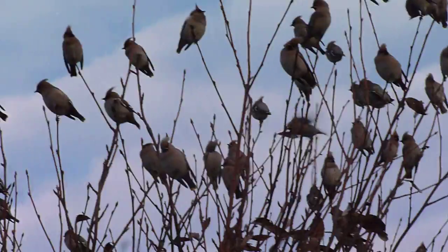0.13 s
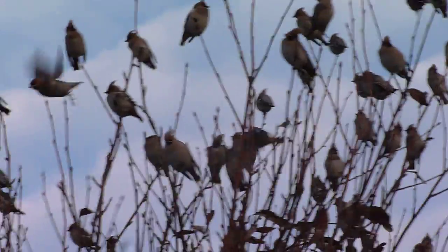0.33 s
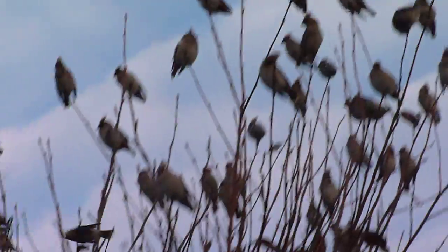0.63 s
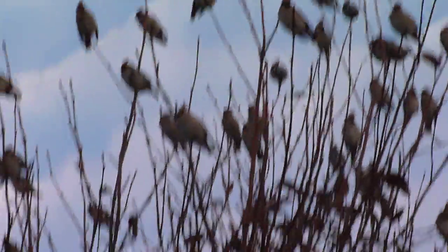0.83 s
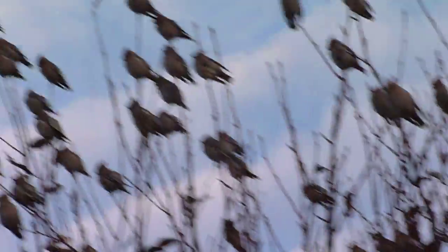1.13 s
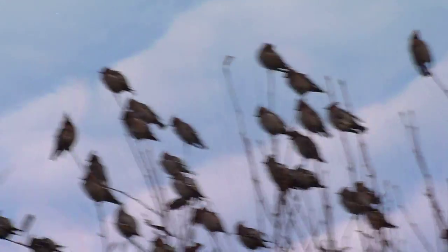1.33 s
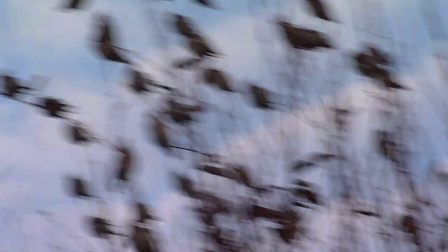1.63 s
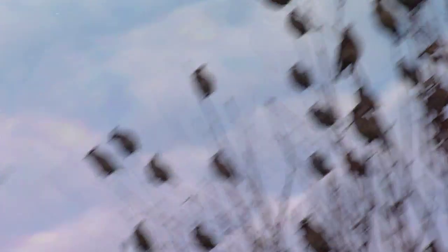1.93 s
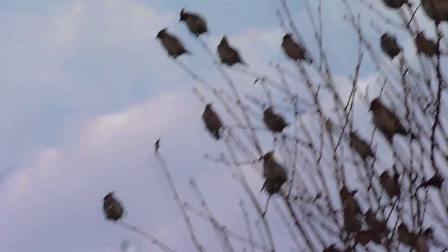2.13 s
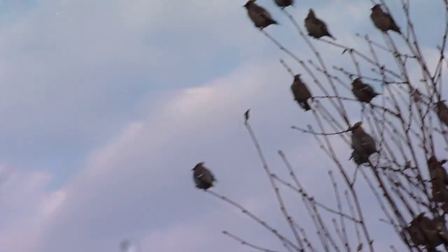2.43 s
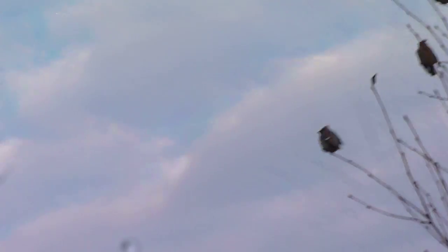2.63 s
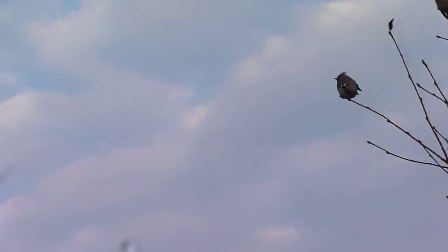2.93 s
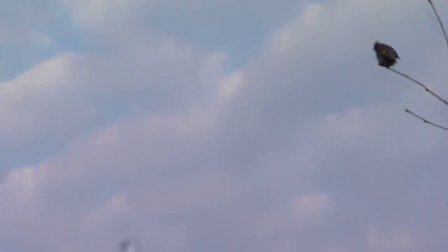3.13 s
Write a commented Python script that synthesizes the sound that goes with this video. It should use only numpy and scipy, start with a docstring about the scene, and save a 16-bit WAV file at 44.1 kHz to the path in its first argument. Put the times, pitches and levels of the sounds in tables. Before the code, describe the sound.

A flock of waxwings trills in bare bushes outdoors, high, rapid whistles overlapping and swelling midway, a few birds closer than the rest. Twigs tick and one snaps sharply early on, while distant traffic rumbles steadily throughout.

```python
"""In bare bushes, with distant traffic rumbling steadily behind, a flock of waxwings trills.
Each trill is a run of whistled syllables, about 18 a second, that flick up, slide down and plunge.
A few near birds stand out from the chorus, which swells midway, and the branches give the calls
a short tail. Twigs snap and tick as the birds shift, and the bush rustles once."""
import sys
import numpy as np
from scipy import signal
from scipy.fft import rfft, irfft
from scipy.io import wavfile
from scipy.ndimage import uniform_filter1d

SR = 44100
rng = np.random.default_rng(int(sys.argv[2]) if len(sys.argv) > 2 else 0)


def transcribe(signal):
    """Save signal, clipped to [-1, 1], as a 16-bit WAV file at the path in sys.argv[1]."""
    frames = np.atleast_2d(signal).T
    limited = np.clip(frames, -1, 1)
    pcm = np.round(limited * 32767).astype(np.int16)
    wavfile.write(sys.argv[1], SR, pcm)


N = 145530


def amp(db):
    """Decibels to gain."""
    return 10 ** (np.asarray(db) / 20)


def unit(x):
    """Scales to rms 1."""
    return x / np.sqrt(np.mean(x ** 2) + 1e-20)


def curve_at(points, hz):
    """Reads an EQ curve on a log-frequency axis."""
    f, db = np.transpose(points)
    return np.interp(np.log(hz + 1), np.log(f + 1), db)


def bell(hz, centre_hz, octaves):
    """A bell-shaped band, 1 at its centre."""
    return np.exp(-.5 * (np.log2((hz + 1) / centre_hz) / octaves) ** 2)


def equalise(x, points):
    """Filters by an EQ curve in dB."""
    gain = amp(curve_at(points, np.fft.rfftfreq(2 * N, 1 / SR)))
    return irfft(rfft(x, 2 * N) * gain)[:N]


def add(mix, s, sound):
    """Mixes a sound in at a time, which may lie before the start."""
    at = round(s * SR)
    sound = sound[max(-at, 0):]
    part = mix[max(at, 0):][:len(sound)]
    part += sound[:len(part)]


def drift(t, step_s, count=48):
    """A smooth random wander."""
    return np.interp(t / step_s, np.arange(count), rng.standard_normal(count))


TYRE_DB_PER_S, DRONE_DB_PER_S = -0.75, 0.4  # the tyre roar recedes, the engine drone draws nearer
# Tone of the far traffic and open air. Each row: frequency in Hz, relative level in dB.
TRAFFIC_EQ = [(20, -27), (36, -20), (50, -3.5), (64, -3), (76, -2), (95, -1), (200, -1), (310, -1),
              (410, -6.5), (700, -1.5), (980, -3), (1400, -11.5), (2000, -21), (3000, -30.5), (4500, -34),
              (6000, -38), (7200, -50.5)]
# Fader ride on the low rumble. Each row: time in seconds, boost or cut in dB.
RUMBLE_RIDE = [(0, 0.5), (.6, -0.6), (.95, 1.6), (1.3, 0.8), (1.9, 0.5), (2.15, 0.5), (2.42, -0.1),
               (2.85, 1), (3.3, -0.5)]


def traffic():
    """Far engines and tyres merge into a soft bed of roar whose balance slowly shifts."""
    frames, hz = N // 1024 + 5, np.fft.rfftfreq(4096, 1 / SR)
    t = np.arange(frames)[:, None] * 1024 / SR
    real, imag, patches = rng.standard_normal((3, frames, len(hz)))
    patches = uniform_filter1d(patches, size=4, axis=0)
    patches_db = 0.35 * unit(uniform_filter1d(patches, size=24, axis=1))  # a faintly uneven texture
    tyres = TYRE_DB_PER_S * bell(hz, centre_hz=1250, octaves=0.62)
    drone = DRONE_DB_PER_S * bell(hz, centre_hz=75, octaves=0.78)
    shift_db = (t - N / SR / 2) * (tyres + drone)
    rumble_db = np.interp(t, *np.transpose(RUMBLE_RIDE)) * bell(hz, centre_hz=190, octaves=0.54)
    spectra = (real + 1j * imag) * amp(curve_at(TRAFFIC_EQ, hz) + patches_db + rumble_db + shift_db)
    roar = signal.istft(spectra.T, nperseg=4096, noverlap=3072)[1][:N]
    return amp(-26.5) * unit(roar)


def engine_hum(pitch_hz=75.4):
    """A far engine's wavering note comes and goes as it draws nearer."""
    t = np.arange(N) / SR
    hz = pitch_hz * (1 + 0.051 * drift(t, step_s=.09))
    level = amp(DRONE_DB_PER_S * t) * (1 + 0.19 * drift(t, step_s=0.13))
    return amp(-43) * unit(level * np.sin(2 * np.pi * np.cumsum(hz) / SR))


# Tone of the rustle. Each row: frequency in Hz, relative level in dB.
RUSTLE_EQ = [(1000, -36), (2200, -10), (3200, -2), (5000, -15), (7500, -14)]


def rustle(peak_s=1.47, width_s=0.025, grains_per_s=1500):
    """A brief, grainy rustle in the bush: one swell of tiny clicks."""
    swell = np.exp(-.5 * ((np.arange(N) / SR - peak_s) / width_s) ** 2)
    grains = rng.standard_normal(N) * (rng.random(N) < grains_per_s / SR)
    return amp(-46) * swell * unit(equalise(grains, RUSTLE_EQ))


# The woody ring of a twig. Each row: frequency in Hz, relative level in dB, seconds to fall 60 dB.
TWIG_MODES = [(1000, -7.5, 0.0044), (1330, 7.5, 0.0089), (1660, -4, 0.0067), (2970, -4, 0.022),
              (3600, -6, 0.016), (4760, 0.5, 0.0054)]
# Snap cues. Each row: start in seconds, peak of the first break in dB, brightness in dB per octave,
# strength of the second break against the first, ring time multiplier.
TWIG_SNAPS = [(.1812, -26, 2, 0.23, 0.87), (.2705, -32, 7, 0.27, 0.92), (.2905, -32, 4, 0.24, 1.0),
              (.3020, -35, 7, .3, 1.0), (.5277, -9.3, -.4, .4, .85), (.7305, -20.5, 0, .7, 2.0),
              (1.4840, -29.5, 8, 0.86, 1.0), (1.4958, -31.5, 4, .6, 1.0), (2.7847, -29, 4.5, 0.7, 1.3)]


def twigs(splinter_s=0.001134, attack_s=0.0002):
    """Dry snaps break in two quick steps, each ringing the twig's modes for a few milliseconds."""
    out, t = np.zeros(N), np.arange(SR // 40) / SR
    attack = 1 - np.exp(-(t / attack_s) ** 2)
    for start, peak_db, brightness, second, ring_scale in TWIG_SNAPS:
        for delay, strength in (0, 1), (splinter_s, second):
            ring = np.zeros(len(t))
            for hz, db, t60 in TWIG_MODES:
                decay = amp(db + brightness * np.log2(hz / 1000) - 60 * t / (t60 * ring_scale))
                detune = 1 + 0.032 * rng.standard_normal()
                ring += attack * decay * np.sin(2 * np.pi * hz * detune * t)
            add(out, start + delay, strength * amp(peak_db) * ring / abs(ring).max())
    return out


def thicket(calls, wet_db=-9.5, t60_s=0.12, echoes=700):
    """Branches and ground scatter the calls into a short tail."""
    delay_s = .003 + (np.arange(echoes) + rng.random(echoes)) / 2000
    taps = np.zeros(SR)
    taps[(delay_s * SR).astype(int)] = rng.choice([-1, 1], echoes) * amp(-60 * delay_s / t60_s)
    return calls + amp(wet_db) * signal.fftconvolve(calls, taps / np.linalg.norm(taps))[:N]


SLIDE_TOWARD_HZ, SLIDE_RISE_DB = 4686, 2
PLUNGE_S, PLUNGE_HZ = 0.0078, 3210
ATTACK_S, RELEASE_S, FLUTTER_DB = 0.012, 0.0016, 4


def syllable(period, top_hz, plunge_db, flick_s):
    """One pure whistle: a rounded flick up, a long slide down and a quick, ragged plunge."""
    knee_s = 0.87 * period  # the slide tips into the plunge here
    knee_hz = top_hz + 0.53 * (SLIDE_TOWARD_HZ - top_hz)
    end_s = knee_s + PLUNGE_S
    t = np.arange(0, end_s, 1 / SR)
    flick = 1 - 0.22 * np.maximum(1 - t / flick_s, 0) ** 2
    slide = np.clip((t - flick_s) / (knee_s - flick_s), 0, 1)
    plunge = np.clip((t - knee_s) / PLUNGE_S, 0, 1)
    hz = flick * (knee_hz + (top_hz - knee_hz) * (1 - slide) ** 0.97)
    hz += (PLUNGE_HZ - knee_hz) * plunge ** 1.3
    hz *= 1 + .011 * drift(t, step_s=0.00401) + 0.026 * plunge * drift(t, step_s=.0015)  # pitch wobble
    plunge_db += 2 * (rng.random() - rng.random())  # no two tails alike
    envelope = np.minimum(t / ATTACK_S, 1) * np.minimum((end_s - t) / RELEASE_S, 1)
    level_db = SLIDE_RISE_DB * slide + plunge_db * plunge + FLUTTER_DB * drift(t, step_s=.005)
    return np.sqrt(2) * envelope * amp(level_db) * np.sin(2 * np.pi * np.cumsum(hz) / SR)


def trill(start, count, period, first_hz, last_hz, first_db, last_db, plunge_db, flick_s):
    """One bird repeats its syllable almost evenly while pitch and level glide."""
    out = np.zeros(N)
    for k, progress in enumerate(np.linspace(0, 1, round(count))):
        late, loud = rng.standard_normal(2)
        gain = amp(first_db + progress * (last_db - first_db) + 0.5 * loud)
        top_hz = first_hz + progress * (last_hz - first_hz)
        add(out, start + k * period + 0.00086 * late, gain * syllable(period, top_hz, plunge_db, flick_s))
    return out


# The swell of the farther birds. Each row: time in seconds, level in dB, typical top pitch in Hz.
CHORUS_RIDE = [(0, -67, 6440), (.3, -55, 6890), (0.549, -64, 6780), (0.851, -62.5, 6480), (1.1, -48, 6840),
               (1.35, -56, 6456), (1.702, -51, 6210), (2.0, -43.5, 6156), (2.3, -48, 6036),
               (2.5, -44.5, 5990), (2.8, -50.5, 6147), (3.3, -46, 6120)]


def chorus(trills=52):
    """Overlapping trills of farther birds, each with its own pitch and pace."""
    times, level_db, top_hz = np.transpose(CHORUS_RIDE)
    out = np.zeros(N)
    for start in np.linspace(-.3, N / SR, trills):
        late, pace, pitch = rng.standard_normal(3)
        first_hz, last_hz = np.interp([start, start + .3], times, top_hz) * (1 + 0.025 * pitch)
        out += trill(start + .03 * late, count=6, period=0.051 * (1 + .06 * pace), first_hz=first_hz,
                     last_hz=last_hz, first_db=-3.5, last_db=0.5, plunge_db=-3.5, flick_s=0.011)
    return unit(out) * amp(np.interp(np.arange(N) / SR, times, level_db))


# Foreground trill cues. Each row: start in seconds, syllable count, syllable period in seconds,
# first and last top pitch in Hz, first and last relative level in dB,
# level change over the plunge in dB, opening flick in seconds.
NEAR_TRILLS = [ (-.005, 2, .0604, 6700, 6300, -56, -62, -10, .005),
               (.010, 3, .0604, 5800, 6100, -58, -55, -2, .011),
               (.124, 4, .0530, 7050, 7100, -57, -57, -14, .005),
               (.147, 4, .0490, 6600, 6700, -55, -57, -2, .008),
               (.320, 3, .0510, 7200, 7100, -57, -56, -14, .005),
               (.378, 3, .0500, 6700, 6600, -58, -55, -6, .008),
               (.490, 4, .0540, 7100, 7000, -54, -56, -14, .005),
               (.623, 6, .0604, 6100, 5700, -59, -53, 5, .011),
               (.868, 2, .0540, 6700, 6450, -58, -53, -12, .005),
               (.971, 5, .0555, 6850, 6900, -50, -49, -16, .005),
               (.997, 5, .0509, 6400, 6200, -50, -47, -3, .009),
               (1.038, 4, .0530, 7000, 7000, -52, -50, -16, .011),
               (1.210, 3, .0590, 7200, 7100, -56, -60, -16, .005),
               (1.243, 4, .0512, 6500, 6300, -54, -53, -8, .011),
               (1.345, 11, .0508, 6100, 6150, -52, -47, -1, .011),
               (1.446, 11, .0545, 6350, 6200, -53, -45, -6, .011),
               (1.688, 7, .0510, 7200, 7400, -57, -52, -16, .005),
               (1.731, 10, .0493, 6100, 6200, -45, -44, -10, .013),
               (1.900, 8, .0515, 5800, 5700, -47, -44, -16, .011),
               (2.105, 6, .0502, 6250, 6200, -44, -43, -7, .009),
               (2.227, 7, .0535, 6300, 6250, -43, -47, -7, .013),
               (2.387, 4, .0540, 6000, 5900, -47, -47, -6, .011),
               (2.425, 3, .0510, 7050, 7250, -59, -50, -16, .005),
               (2.592, 5, .0505, 6200, 6250, -49, -49, -8, .011),
               (2.876, 7, .0553, 6050, 6000, -50, -46, 3, .013),
               (2.955, 3, .0555, 7050, 7050, -61, -61, -16, .005),
               (3.108, 4, .0490, 7100, 7300, -53, -52, -16, .005),
               (3.130, 4, .0520, 6100, 6150, -50, -49, -6, .011)]


def near_birds(fader_db=-3):
    """A few close waxwings whistle their trills in front of the flock."""
    return amp(fader_db) * sum(trill(*cue) for cue in NEAR_TRILLS)


def scene():
    """The mono mix: birds in the bushes over the traffic bed."""
    birds = thicket(near_birds() + chorus())
    return (birds + twigs() + rustle() + traffic() + engine_hum())[None]


# Tone of the microphone. Each row: frequency in Hz, gain in dB.
MIC_EQ = [(1, 1.5), (6200, -0.5), (6800, -1.5), (7200, -6), (7600, -13.5)]


def record(dry, cutoff_hz=7550):
    """A small microphone with a dull top and a steep band limit."""
    lowpass = signal.firwin(401, cutoff_hz, window=("kaiser", 9), fs=SR)
    return signal.fftconvolve(equalise(dry[0], MIC_EQ), lowpass, "same")[None]


dry = scene()
out = record(dry)
transcribe(out)
```